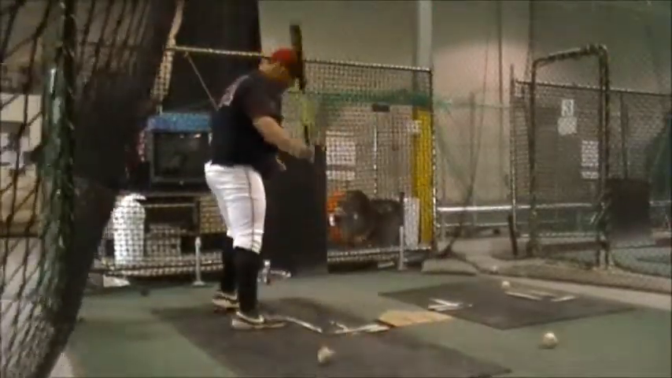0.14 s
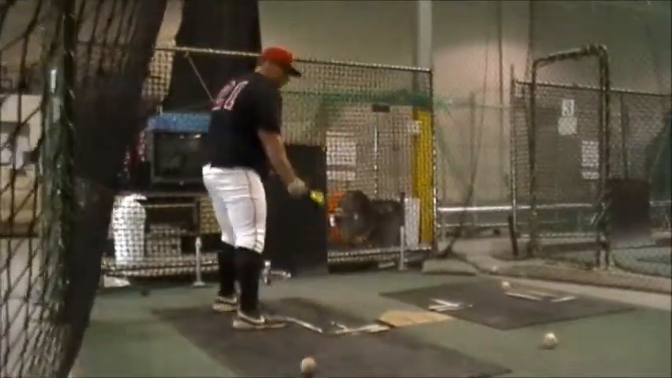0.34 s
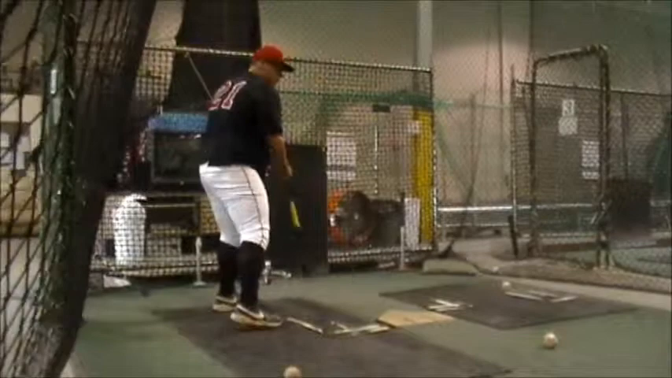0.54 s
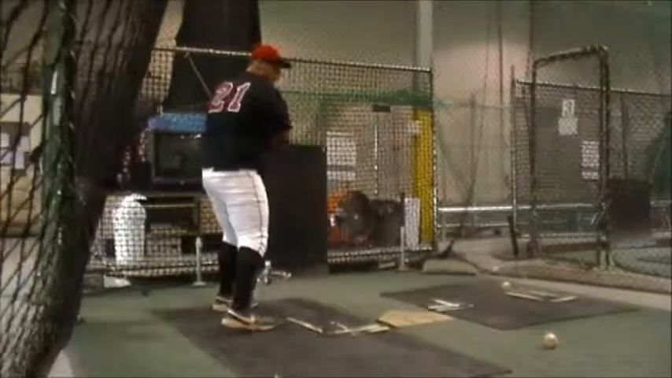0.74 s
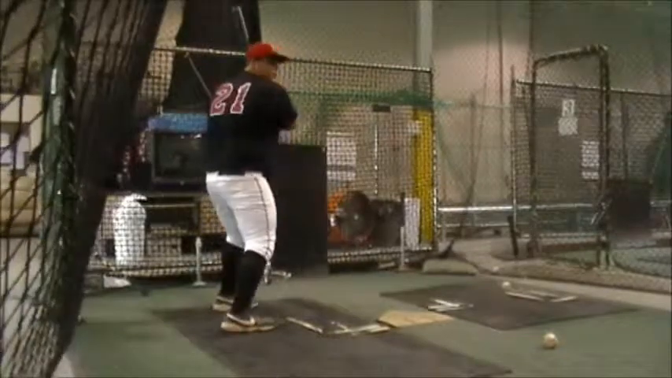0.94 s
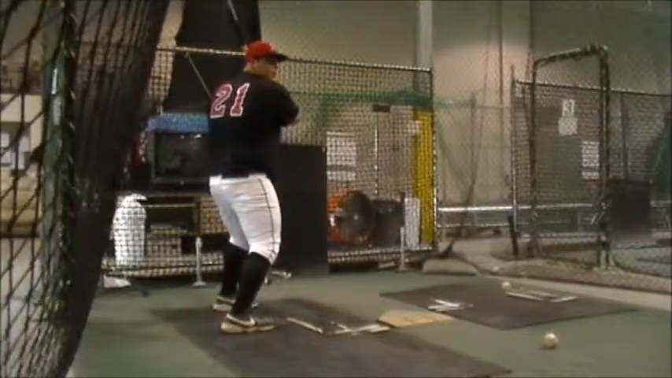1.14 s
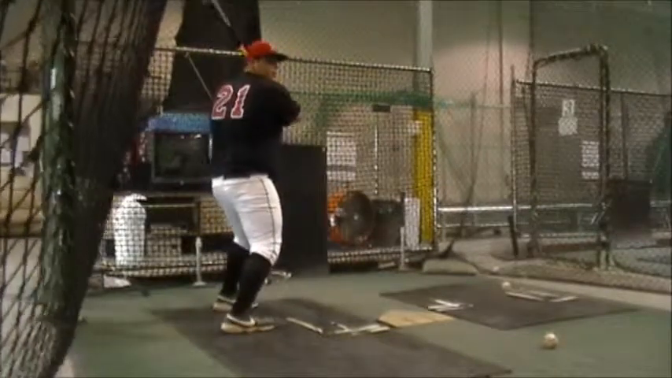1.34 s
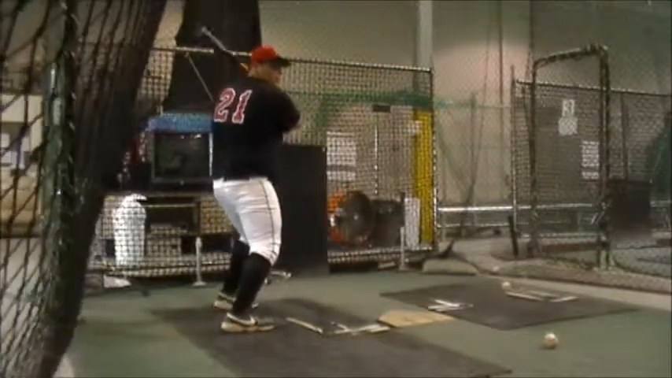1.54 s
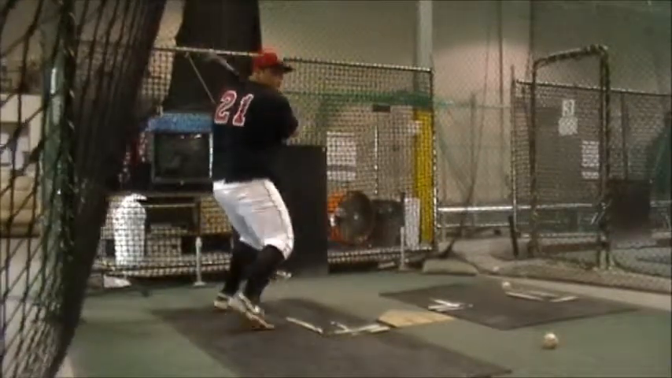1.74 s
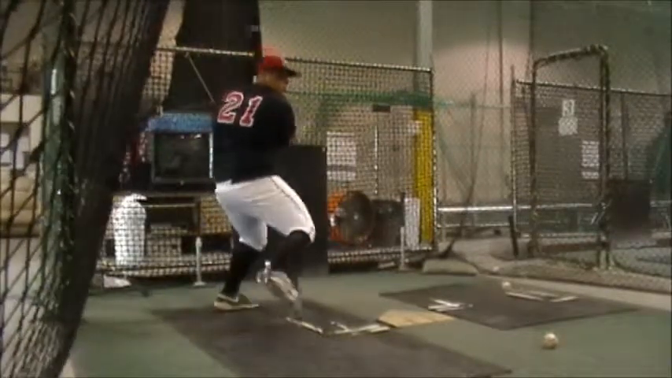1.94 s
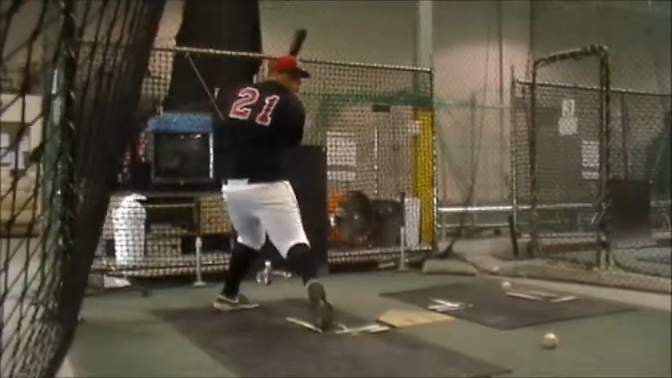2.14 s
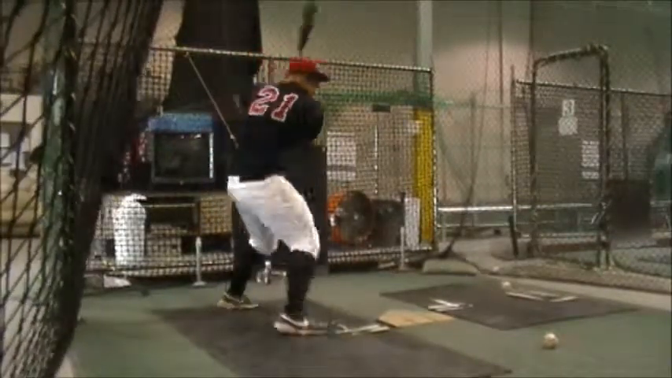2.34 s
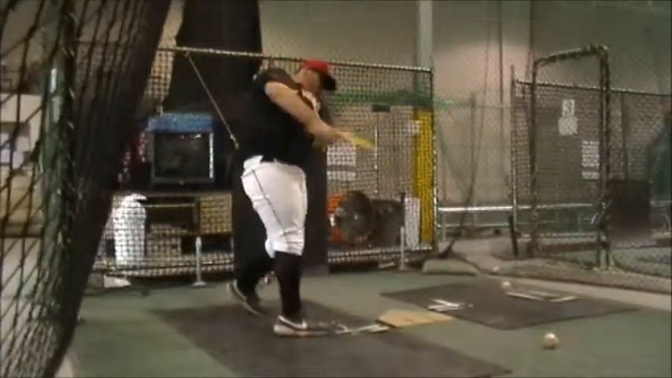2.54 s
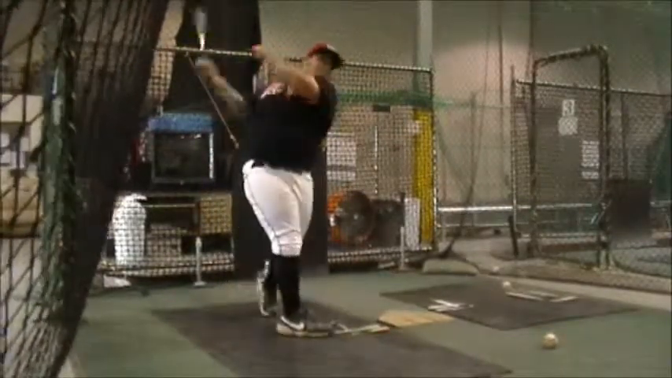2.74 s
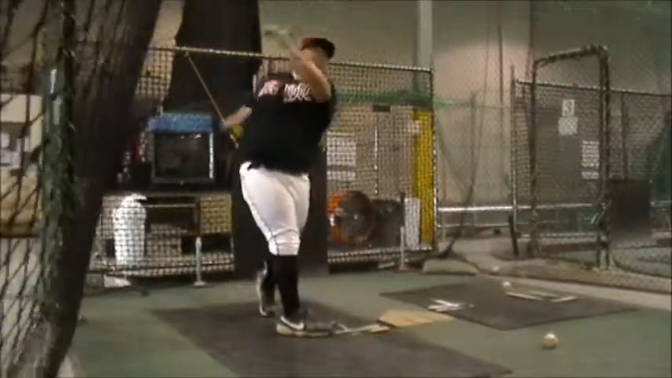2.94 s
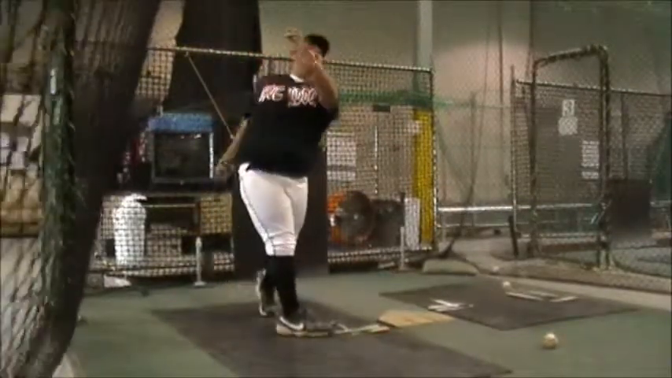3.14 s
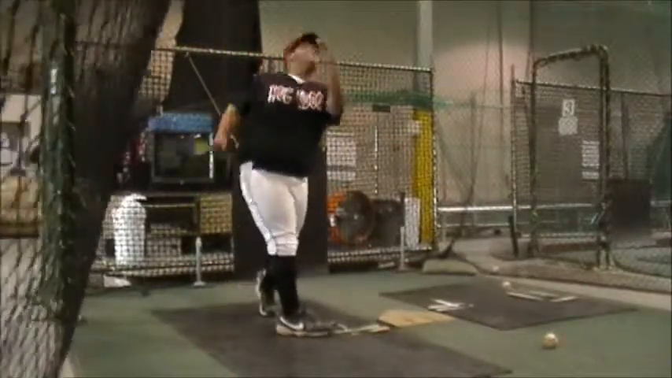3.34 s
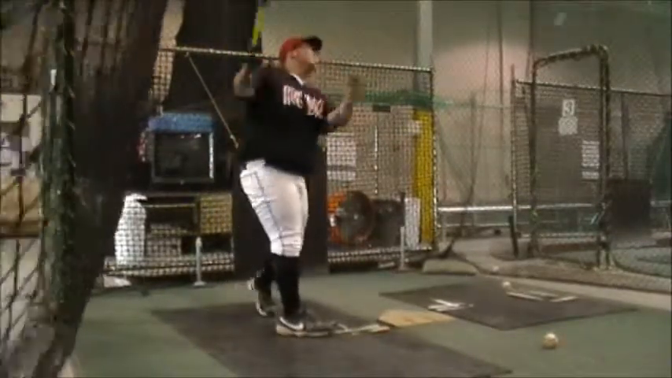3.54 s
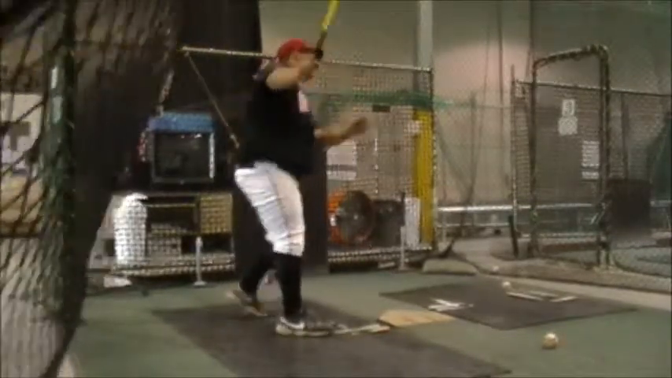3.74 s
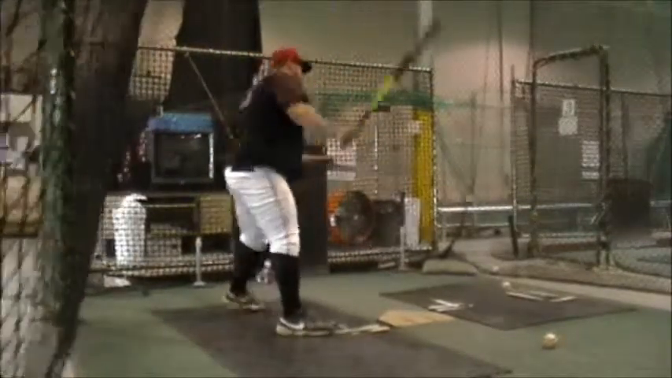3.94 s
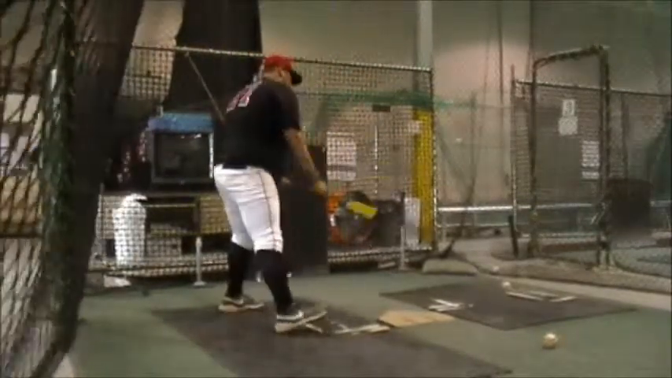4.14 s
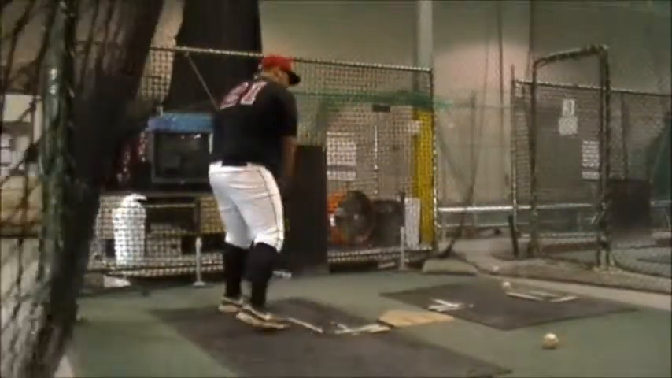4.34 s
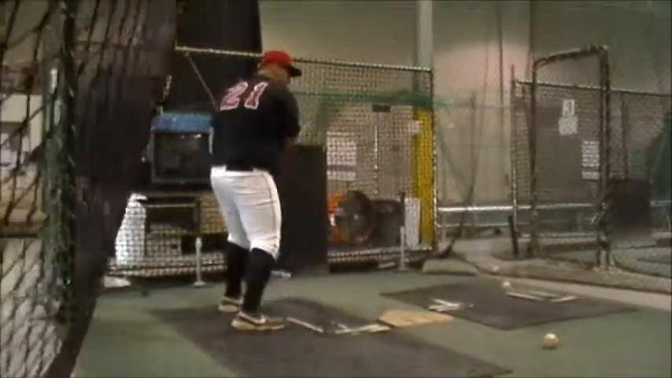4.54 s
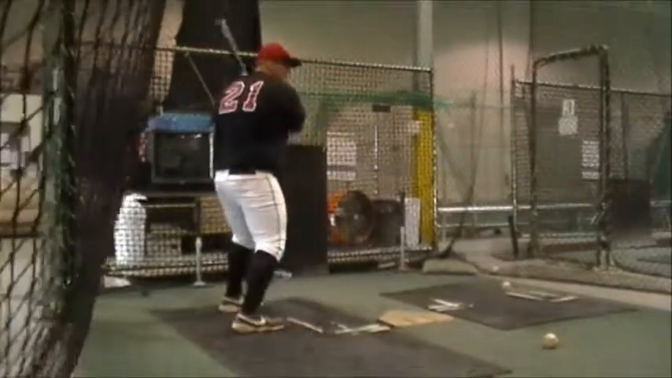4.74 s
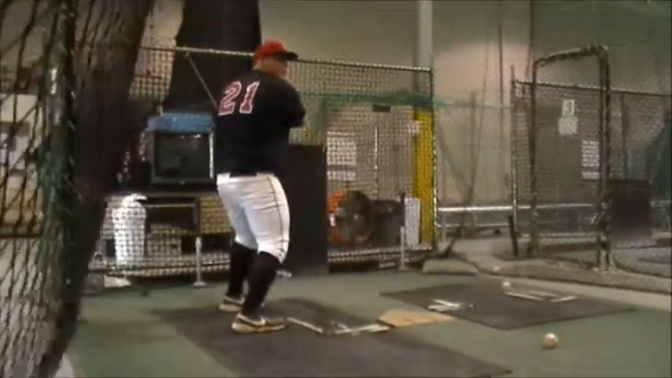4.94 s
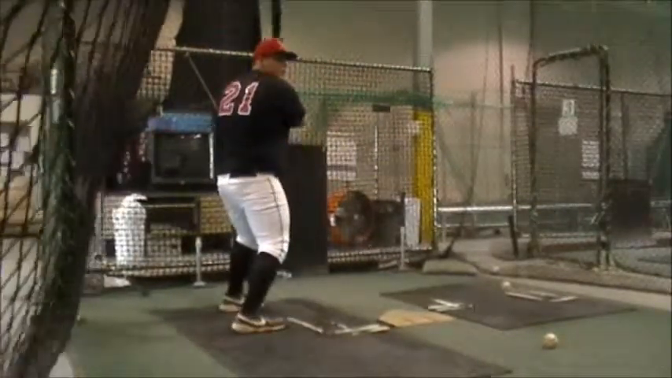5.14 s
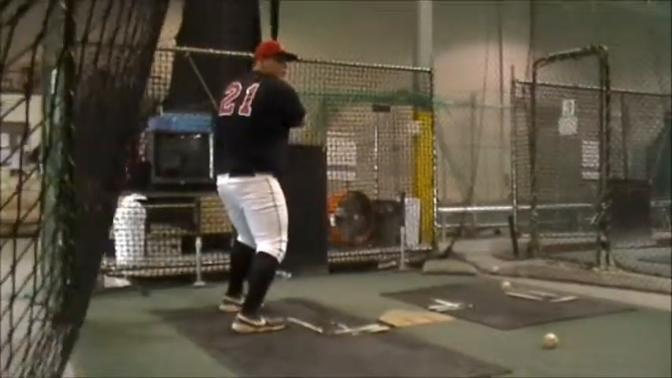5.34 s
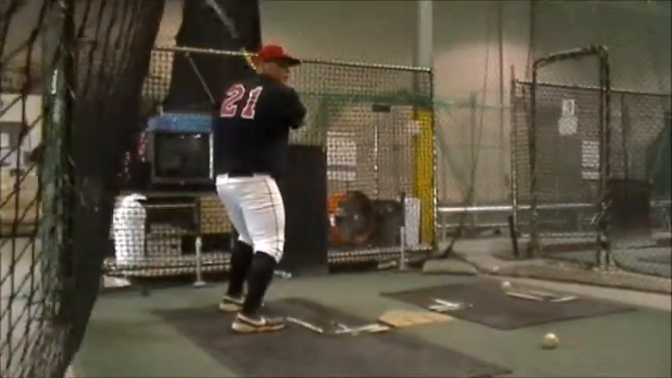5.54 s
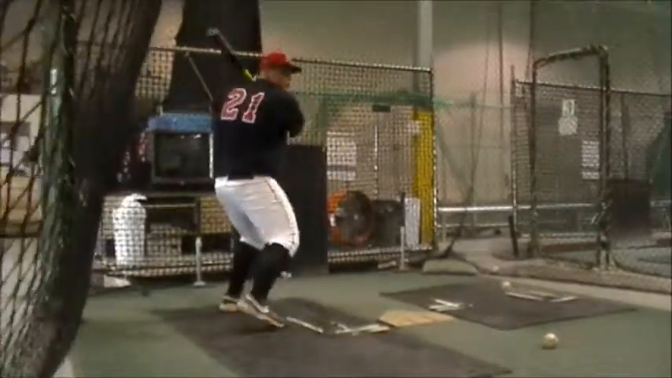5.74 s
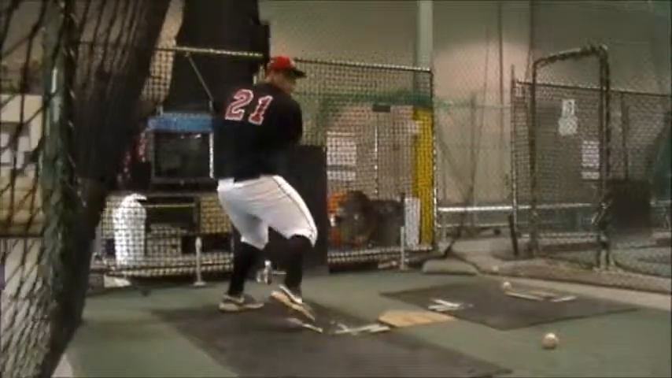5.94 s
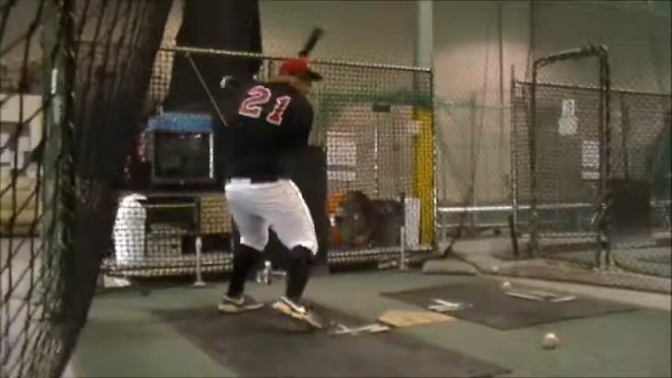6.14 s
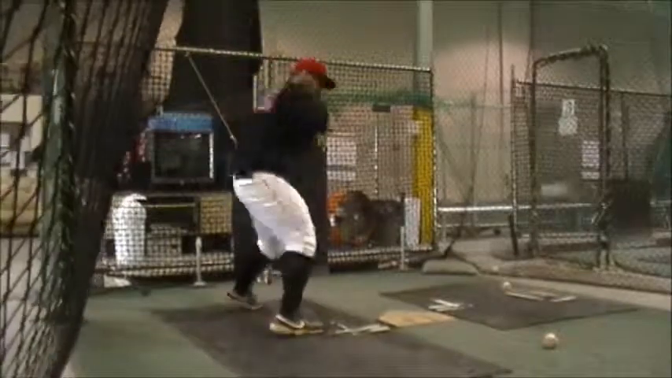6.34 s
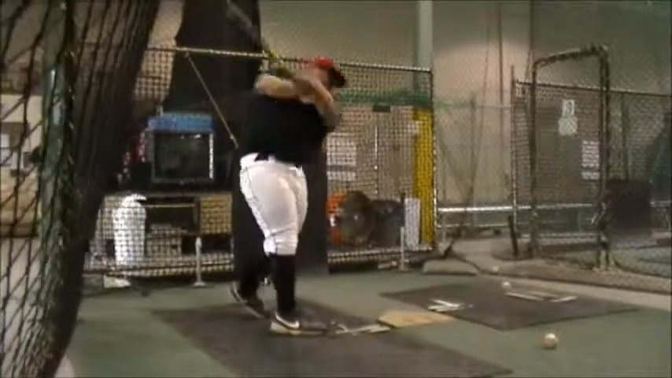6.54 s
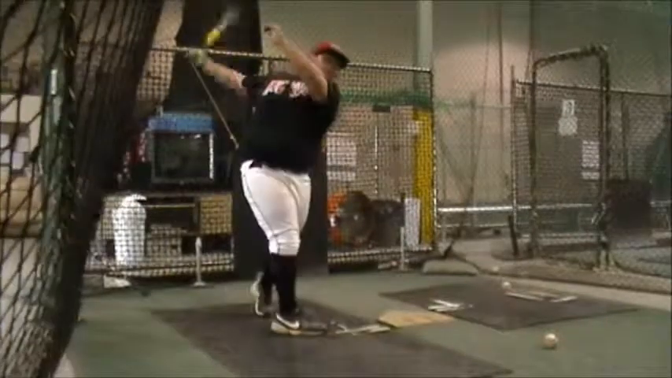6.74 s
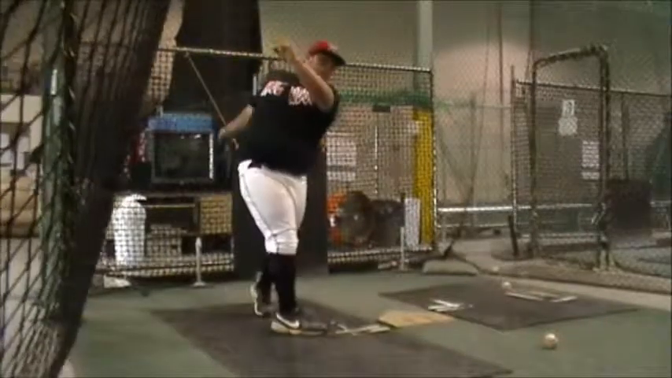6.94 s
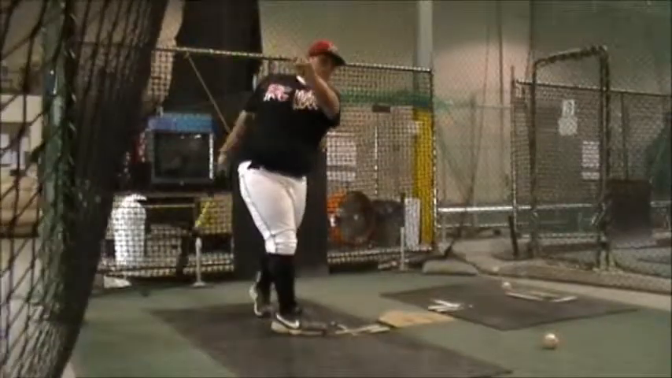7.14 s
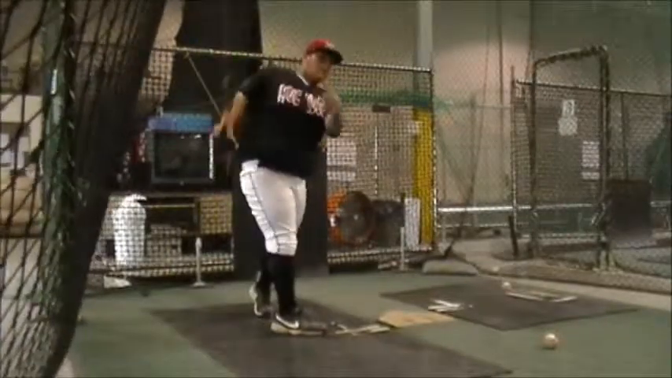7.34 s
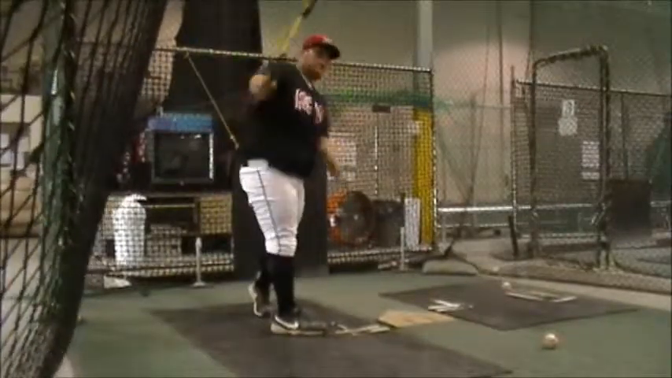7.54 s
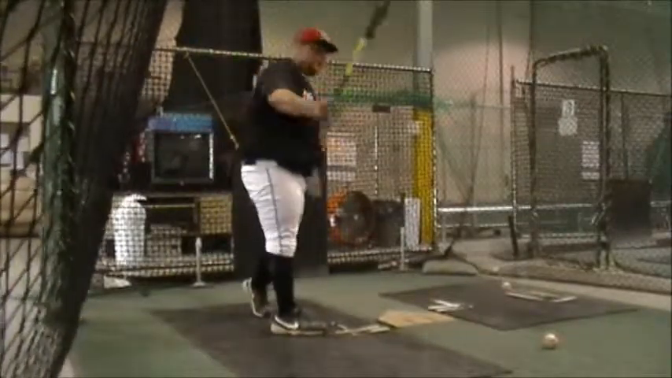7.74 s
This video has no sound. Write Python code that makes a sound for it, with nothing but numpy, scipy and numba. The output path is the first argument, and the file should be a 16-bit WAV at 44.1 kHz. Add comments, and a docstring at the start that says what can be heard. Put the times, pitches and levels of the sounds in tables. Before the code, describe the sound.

A loose ball hops on a mat with several soft, low thumps during the first 0.7 seconds, over a quiet, steady ventilation hum in a large, hard hall. Faint cloth rustle and shoe scuffs lead to a soft step. At about 2.6 seconds a metal bat swishes briefly and hits a ball with a loud crack and a bright ping; the ball at once slams into a steel screen, which rattles and rings. The crack overloads the microphone and leaves a long echo. Light scuffs follow, then a distinct ball knock near 3.9 seconds and a soft step at 4.4. Only hum and slight rustling remain until a second sharp, ringing hit at about 6.5 seconds, with a hard knock and a lighter screen rattle. As the echo fades, the ball knocks at 7.1 seconds, clinks faintly on steel and lands softly at 7.6.

```python
"""A loose ball hops over a mat to the hum of ventilation: a netted batting cage in a large, hard hall.
Shoes scuff, a jersey rustles, and twice a metal bat swishes, cracks against a ball and pings from its
hollow barrel. Each hit slams into a steel screen, which rattles and rings; the ball drops and thuds.
The cracks overload the microphone; its gain ducks and creeps back, holding up the hall's long tail."""
import sys
import numpy as np
from scipy import signal
from scipy.fft import rfft, irfft, next_fast_len
from scipy.io import wavfile
from scipy.ndimage import uniform_filter1d, map_coordinates
from numba import njit

SR = 44100
rng = np.random.default_rng(int(sys.argv[2]) if len(sys.argv) > 2 else 0)


def store_wav(level_fs):
    """Save 16-bit WAV to argv[1]."""
    pcm = np.round(np.clip(np.atleast_2d(level_fs), -1, 1) * 32767)
    wavfile.write(sys.argv[1], SR, pcm.T.astype(np.int16))


N = 344421
TIME = np.arange(N) / SR
AGE = np.arange(SR // 2) / SR  # time since a contact [s]

# the loose ball's hops: (time [s], boom [dB], tick [dB])
BALL_HOPS = [(.0, -19, -32.5), (0.1258, -12.5, -34.5), (0.2336, -18, -46), (0.3604, -23.5, -47),
             (0.445, -24, -47), (0.592, -27.5, -44), (0.686, -28, -40)]
# tick of its hide: (frequency [Hz], level [dB])
TICK_EQ = [(200, -8), (550, -2), (1200, -8), (4000, -18), (8000, -21.5), (16000, -35)]
# ventilation air bed: (frequency [Hz], level [dB])
AIR_EQ = [(15, -46), (25, -42), (48, -13), (108, 1), (141, -2), (212, 3.5), (317, -3), (394, -4), (427, -7),
          (1190, -8), (2480, -15), (3820, -18.5), (7310, -27), (12900, -44.5), (16000, -40)]
# fan and motor tones: (frequency [Hz], level [dB])
HUM_TONES = [(58, -66), (204.6, -81), (990.5, -69.5)]
# when the electrical whine stands out: (start [s], end [s])
WHINE_TIMES = [(-.1, .97), (3.25, 7.34)]
# a ball knocks on net, floor or mat:
# (time [s], level [dB], pitch [Hz], click re level [dB], thump re level [dB], pan [dB], hall send [dB])
BALL_KNOCKS = [(0.2821, -33.5, 450, 3.5, -20, -0.5, -12), (2.647, -2, 372, -17, -32, 0, -24),
               (3.22, -25, 710, -5, -10, -2, 19), (3.884, -19, 474, -30, -33, -5.5, 14),
               (3.894, -3.5, 593, -2, -8.5, -1, 1), (6.566, 4, 1075, 0, -25, -2, -12),
               (6.584, -7, 440, -20, -23, -1, -17), (7.0758, -7.5, 940, -3, -13, -6, 5),
               (7.6097, -16.5, 483, -9, -20, -4.5, 3.5)]
# light clatter after a knock: (frequency [Hz], level [dB])
REBOUND_EQ = [(100, 5), (600, 9), (2200, 7), (5000, -6), (7000, -31), (16000, -49)]
# the batter shifts in his jersey: (time [s], level [dB], half-length [s])
BODY_SHIFTS = [(1.735, -61, .012), (1.815, -65, 0.0045), (2.363, -59, 0.045), (2.454, -61, .018),
               (3.22, -58, 0.022), (4.45, -64.5, 0.69), (4.95, -58, 0.035), (6.335, -61, 0.0091)]
# cloth rustle: (frequency [Hz], level [dB])
CLOTH_EQ = [(1500, 12), (4000, 11), (9000, 1.5), (13000, 1), (16000, -6)]
# short scrapes: shoes on the mat, and at 7.388 s the grit of the ball's clink on the frame: (time [s], level
# [dB], centre [Hz], t60 [s], rise [s])
SCUFFS = [(1.718, -46, 5040, 0.12, .012), (1.739, -44.5, 6450, 0.046, .002),
          (2.397, -29, 3500, 0.013, .001), (3.645, -28.5, 3870, 0.014, .0012),
          (3.697, -40.5, 3800, 0.12, 0.0028), (3.74, -34, 5500, 0.15, 0.04),
          (3.78, -26.5, 6400, 0.018, 0.0009), (7.198, -47, 4160, 0.063, .0012),
          (7.388, -40.5, 4005, 0.048, .0012), (7.605, -47, 4340, 0.06, .0012)]
# the batter plants a foot: (time [s], level [dB], pitch [Hz])
FOOTFALLS = [(2.158, -31.5, 179), (4.431, -31.5, 327)]
# slap of the sole: (frequency [Hz], level [dB])
SOLE_EQ = [(100, -12), (600, -6), (2000, 44), (4000, -11), (6000, -27), (10000, -37), (16000, -40)]
# bat meets ball: (time [s], ping [dB], overtone re ping [dB], crack [dB], shell [dB],
# spot along the barrel [0-1], tock [dB], swish [dB], swish pitch [Hz], hall send [dB])
BAT_HITS = [(2.5877, 11, -18, 14.5, 12.5, 0.25, -1, -30, 90, -6.5),
            (6.5268, 9.5, -32, 12, 20, 0.13, -4, -28.5, 150, -6)]
# air around the swinging bat: (frequency [Hz], level [dB])
SWISH_EQ = [(30, -16), (80, -18.5), (150, -12), (300, -25.5), (1500, -27), (6000, -39.5)]
# the direct crack: (frequency [Hz], level [dB])
CRACK_EQ = [(40, -25), (150, 8.5), (600, 19), (1400, 5.5), (2300, 14), (3300, 13), (5000, 2), (8000, 9.5),
            (13000, -13), (16000, 6.5)]
# the crack thrown sideways into the hall: (frequency [Hz], level [dB])
SIDE_CRACK_EQ = [(150, -9.5), (550, 18), (1400, 15), (2300, 16), (3400, 11), (5000, 5), (8000, 0.5),
                 (16000, -21)]
# barrel shell modes that the ball damps at once: (frequency [Hz], level [dB], t60 [s])
SHELL_MODES = [(2194, -7.5, 0.017), (3501, 6, 0.021), (4388, 0, 0.022), (5497, -5.5, 0.029)]
# the bat bends as the ball squashes: (frequency [Hz], level [dB], t60 [s])
TOCK_MODES = [(320, 6, 0.021), (646, 8, 0.015), (1260, 9.5, 0.022)]
# the barrel flies away from the walls, so each gets a lower ping: (pitch [ratio], level [dB])
WALL_DOPPLERS = [(0.93, -1), (.963, -4.5), (0.89, -2), (.93, -5), (0.99, 4.5), (0.65, -7)]
# single-wall returns of a hit: (time [s], pitch [ratio], ping [dB], shell [dB], crack [dB])
SLAPBACKS = [(2.622, .965, -9, -16, -7), (2.639, .942, -2, -20, -13), (2.688, .962, -3, -14, -4),
             (2.701, .952, -5, -23, -20), (6.563, .948, -2, -8, -18), (6.603, .93, -10, -3, -8),
             (6.619, .995, 0, -7, -7)]
# ball meets screen: (time [s], clatter [dB], ring [dB], ring tilt [dB/octave], clatter t60 [s],
# clatter tilt [dB/octave], pan [dB], hall send [dB])
SCREEN_SLAMS = [(2.716, 8.5, 11, 0, 0.066, 0.44, -10, -2), (6.566, -7, -19, 4, 0.049, 1, 1, -8),
                (6.657, -6.5, -6.5, -0.5, 0.2, 0.8, -8, -6.5)]
# the screen's rattle: (frequency [Hz], level [dB])
CLATTER_EQ = [(40, -46), (120, -46), (300, -19), (550, 8), (1300, 3.5), (2000, 3.5), (3200, -2.5),
              (4100, 5), (5400, 0.5), (6500, -4.5), (10000, -10), (16000, -24.5)]
# that rattle back from the far wall: (frequency [Hz], level [dB])
FAR_CLATTER_EQ = [(150, -50), (700, 0), (2500, 9), (5000, 7.5), (6500, -0.5), (15000, -27.5)]
# clang of the steel frame: (frequency [Hz], level [dB], t60 [s])
FRAME_MODES = [(561, 1.5, 0.03), (675, -13.5, 0.097), (870, -2.5, 0.078), (1262, 4, 0.027),
               (1410, 1, 0.024), (3830, -5, 0.055)]
# hollow, beating ring of its tubes: (frequency [Hz], level [dB], t60 [s])
TUBE_MODES = [(605, -27, .5), (671, -18, 0.53), (690, -21, 0.53), (871, -16, 0.32), (897, -16, 0.33)]
# close frame modes that sing on: (frequency [Hz], level [dB], t60 [s])
SHIMMER_MODES = [(3878, -36, 1.7), (3909, -37.5, 1.85), (3935, -40, 1.6), (4011, -39, 1.4),
                 (4112, -42, 1.7)]
# the frame, lightly touched: (frequency [Hz], level [dB], t60 [s])
CLINK_MODES = [(3880, -31.5, 0.043), (4000, -47, 0.35), (4500, -49, 0.11)]
# reverb decay: (frequency [Hz], t60 [s])
HALL_DECAY = [(100, 1.5), (250, 2.77), (600, 2.81), (1300, 3.21), (2900, 1.89), (4100, 1.7), (4800, 1.43),
              (5500, 1.2), (8000, 0.88), (15000, 0.45)]
# reverb colour: (frequency [Hz], level [dB])
HALL_EQ = [(60, -109), (200, 10), (400, -17.5), (1200, -10.5), (3000, -5.5), (5000, -5.5), (8000, -7.5),
           (15000, -2.5)]
# stereo width of diffuse sound: (frequency [Hz], side re mid [dB])
STEREO_WIDTH = [(40, -2), (150, -12.5), (400, -7.5), (1000, -7.5), (2500, -8.5), (5000, -19), (9000, -41),
                (13000, -0.5)]
# notches of the microphone port: (frequency [Hz], width [Hz], depth [0-1])
PORT_NOTCHES = [(5740, 340, 0.88), (7270, 850, 0.58), (2490, 124, 0.51)]

PING_HZ, PING_T60 = 2919, 0.078  # the hollow barrel's main ring
OVERTONE_HZ, OVERTONE_T60 = 7440, 0.1  # its upper ring


def amp(db):
    """Decibels to gain."""
    return 10 ** (np.asarray(db) / 20)


def unit(x):
    """Scale to rms 1."""
    return x / np.sqrt(np.mean(x ** 2) + 1e-20)


def along(points, hz):
    """Read a curve on a log frequency axis."""
    freqs, values = np.transpose(points)
    return np.interp(np.log(hz + 1), np.log(freqs + 1), values)


def wobble(rate):
    """A smooth random curve, rate knots a second."""
    return map_coordinates(rng.standard_normal(int(N * rate / SR) + 4), [TIME * rate])


def fade_in(rise_s):
    """A softened attack."""
    return 1 - np.exp(-AGE / rise_s)


def swell(s, db, half_s):
    """A smooth rise and fall of gain around time s."""
    return amp(db) * np.exp(-.5 * ((TIME - s) / half_s) ** 2)


def gate(start, end, fade_s=0.065):
    """A soft switch that is on between two times."""
    return np.clip(np.minimum(TIME - start, end - TIME) / fade_s, 0, 1)


def filtered(x, response):
    """Shape x with a frequency response."""
    size = x.shape[-1]
    padded = next_fast_len(size + 8192)
    return irfft(rfft(x, padded) * response(np.fft.rfftfreq(padded, 1 / SR)), padded)[..., :size]


def noise(eq, size):
    """Coloured noise of rms 1, as two close microphones hear a diffuse field."""
    colour = lambda hz: amp([along(eq, hz), along(eq, hz) + along(STEREO_WIDTH, hz)])
    mid, side = filtered(rng.standard_normal((2, size)), colour)
    return unit(np.array([mid + side, mid - side]))


def burst(eq, t60):
    """Noise that starts at once and dies away."""
    return noise(eq, len(AGE)) * amp(-60 * AGE / t60)


def ring(modes, doppler=1):
    """Damped modes of a struck object; the air follows the change of its motion."""
    out = np.zeros(len(AGE))
    for k, (hz, db, t60) in enumerate(modes):
        omega = 2 * np.pi * hz * doppler
        motion = amp(db - 60 * AGE / t60) * np.sin(omega * AGE) * fade_in(1 / omega)
        out += (-1) ** k * np.diff(motion, prepend=0) * SR / omega
    return out


def add(track, s, sound):
    """Mix a sound into the track from time s."""
    start = max(round(s * SR), 0)
    part = sound[..., :N - start]
    track[:, start:start + part.shape[-1]] += part


def place(sound, pan_db, twist=3, spread=1.43, top_hz=3200, twist_hz=380):
    """Pan left (+) or right (-): by level in the mids, by phase in the bass."""
    lean = np.tanh(pan_db * np.log(10) / 40) * np.array([[1], [-1]])
    width = lambda f: spread / np.hypot(1, f / top_hz) + 1j * twist * f * twist_hz / (f*f + twist_hz**2)
    return filtered(sound, lambda f: (1 + lean * width(f)) / np.hypot(1, np.abs(lean * width(f))))


def hall(sound, blur_hz=70, build_s=0.0028, echo_s=0.086, echo_t60=0.41, echo_gain=2.67):
    """Reverb: scatter builds up through the nets, then the far wall returns a cluster of echoes."""
    # each wall hears the source from another side, so fine spectral ripple averages out
    power = np.mean(np.abs(rfft(np.atleast_2d(sound))) ** 2, axis=0)
    power = uniform_filter1d(power, size=int(blur_hz * AGE[-1]) + 1)
    colour = lambda f: np.interp(f, np.fft.rfftfreq(len(AGE), 1 / SR), np.sqrt(np.abs(power)))
    wash = filtered(noise([(100, 0), (1000, 0.009)], 2 * SR), colour)
    hz, t, bands = signal.stft(wash, SR, nperseg=256)
    decay = amp(along(HALL_EQ, hz)[:, None] - 60 * t / along(HALL_DECAY, hz)[:, None])
    tail = signal.istft(bands * decay, SR, nperseg=256)[1]
    t = np.arange(tail.shape[1]) / SR
    far_wall = echo_gain * amp(-60 * np.abs(t - echo_s) / np.where(t > echo_s, echo_t60, 1.0))
    return tail * np.minimum(t / build_s, 1) * (1 + far_wall) * np.sqrt(np.log(1000) / SR)


def loose_ball(boom_hz=190.5, boom_t60=0.049, hall_db=-2.5):
    """Each hop makes the mat boom; the hide adds a faint tick."""
    out = np.zeros((2, N))
    for s, boom_db, tick_db in BALL_HOPS:
        boom = ring([(boom_hz, boom_db, boom_t60)]) * fade_in(0.0016)
        tick = amp(tick_db) * burst(TICK_EQ, t60=0.0088)
        add(out, s, place(boom + tick, pan_db=-1))
        add(out, s, amp(hall_db) * hall(boom, build_s=0.023, echo_s=0.069, echo_t60=0.63))
    return out


def ventilation(air_db=-48.5, whine_hz=12620, whine_db=-80, motor_hz=387.3, motor_db=-59.5):
    """A bed of rushing air, wavering fan tones and thin electrical whine; a distant motor joins late."""
    def tone(hz, sway_db=3.5):
        phase = 2 * np.pi * hz * TIME + 0.18 * wobble(2.75)
        return np.sqrt(2) * np.sin(phase) * amp(sway_db * wobble(2.65))

    whine = np.sqrt(2) * np.sin(2 * np.pi * whine_hz * TIME + 1.5 * wobble(90))
    whine *= amp(whine_db) * np.maximum(sum(gate(*span) for span in WHINE_TIMES), 0.15)
    motor = amp(motor_db) * gate(5.13, np.inf, fade_s=0.21) * tone(motor_hz, sway_db=-3)
    air = amp(air_db) * noise(AIR_EQ, N)
    hum = sum(amp(db) * tone(hz) for hz, db in HUM_TONES)
    return air + hum + motor + whine


def knocks(decay_cycles=5.4, thump_ratio=0.37, lag_cycles=2.06, click_hz=2000, click_t60=0.0034):
    """A ball lands: a click, a dead thud, a lower thump as the surface gives, then a light rebound."""
    out = np.zeros((2, N))
    for s, db, hz, click_db, thump_db, pan_db, hall_db in BALL_KNOCKS:
        thump_hz = hz * thump_ratio
        thud = ring([(hz, db, decay_cycles / hz)])
        thump = ring([(thump_hz, db + thump_db, decay_cycles / thump_hz)])
        click = ring([(click_hz, db + click_db, click_t60)])
        rebound = amp(db + click_db - 10.5) * burst(REBOUND_EQ, t60=0.037) * fade_in(0.0052)
        add(out, s, place(thud + click, pan_db))
        add(out, s + lag_cycles / hz, place(thump, pan_db / 2))
        add(out, s + 0.028, rebound)
        send = np.array([thud, amp(-5) * thump, amp(-10) * click])
        add(out, s, amp(hall_db) * hall(send, echo_s=0.073, echo_t60=1.0, echo_gain=3.63))
    return out


def jersey(rest_db=-67, grain_db=3, stride_lead_s=0.14):
    """Cloth rustles unevenly with each shift of the body, stride and swing."""
    motion = amp(rest_db) + sum(swell(*shift) for shift in BODY_SHIFTS)
    for s, *_ in BAT_HITS:
        motion += swell(s - stride_lead_s, db=-64, half_s=0.11) + swell(s, db=-58, half_s=0.035)
    return motion * amp(grain_db * wobble(50)) * noise(CLOTH_EQ, N)


def scuffs(hall_db=-9):
    """Shoes rub the mat in short, bright scrapes; one scrape gives the frame's clink its grit."""
    out = np.zeros((2, N))
    for s, db, hz, t60, rise_s in SCUFFS:
        eq = [(hz / 4, -22), (hz / 2, -3), (hz, 0), (hz * 2, -10), (hz * 4, -26)]
        scuff = amp(db) * burst(eq, t60) * fade_in(rise_s)
        add(out, s, scuff)
        add(out, s, amp(hall_db) * hall(scuff, blur_hz=400))
    return out


def steps(decay_cycles=9, slap_db=-12):
    """A foot comes down on the mat with a soft thud and a slap of the sole."""
    out = np.zeros((2, N))
    for s, db, hz in FOOTFALLS:
        thud = ring([(hz, db, decay_cycles / hz)])
        add(out, s, thud + amp(db + slap_db) * burst(SOLE_EQ, t60=0.014))
    return out


def swish(hz, t60=0.096, air_db=-4):
    """The bat sweeps the air: noise and a low tone, reversed to swell into the hit."""
    whoosh = amp(air_db) * burst(SWISH_EQ, t60) + ring([(hz, 0, t60)])
    return whoosh[:, ::-1]


def bat(crack_t60=0.032, squash_s=0.00185, release_s=0.0025, bloom_s=0.0042, pan_db=-3):
    """Swish, crack of contact, tock of the bending bat, then a ping that blooms as the ball leaves."""
    out = np.zeros((2, N))
    for s, ping_db, over_db, crack_db, shell_db, spot, tock_db, swish_db, swish_hz, hall_db in BAT_HITS:
        add(out, s - AGE[-1], amp(swish_db) * swish(swish_hz))
        # a shell mode stays weak when the ball lands near one of its nodes
        shell = [(hz, shell_db + db + 10 * np.log10(np.cos(np.pi * k * spot) ** 2 + .01), t60)
                 for k, (hz, db, t60) in enumerate(SHELL_MODES)]
        ping = (PING_HZ, ping_db, PING_T60)
        barrel = ring([ping, (OVERTONE_HZ, ping_db + over_db, OVERTONE_T60)]) * fade_in(bloom_s)
        crack = amp(crack_db) * burst(CRACK_EQ, crack_t60)
        add(out, s, place(crack + ring(shell), pan_db))
        add(out, s + squash_s, place(amp(tock_db) * ring(TOCK_MODES), pan_db))
        add(out, s + release_s, place(barrel, pan_db))
        add(out, s, amp(ping_db) * after_ring())
        crack_tail = hall(burst(SIDE_CRACK_EQ, crack_t60), blur_hz=380)
        add(out, s + 0.02, amp(hall_db + crack_db - 2) * crack_tail)
        # every wall rings on with its own lowered copy of the ping
        copies = np.array([amp(db) * (ring([ping], ratio) + amp(-10) * ring(shell, ratio))
                           for ratio, db in WALL_DOPPLERS])
        ping_tail = hall(copies, blur_hz=11, build_s=0.052, echo_s=0.12, echo_gain=1)
        add(out, s, amp(hall_db + 0.5) * ping_tail)
    return out


def after_ring(re_ping_db=-43.5, t60=1.9, sway=0.003):
    """The barrel sings on faintly, its pitch swaying with the follow-through."""
    t = TIME[:2 * SR]
    hz = PING_HZ * (1 + sway * wobble(5.27)[:len(t)])
    return amp(re_ping_db - 60 * t / t60) * np.sin(2 * np.pi * np.cumsum(hz) / SR)


def wall_echoes(smear_s=0.03):
    """Nearby walls slap back the crack and ping, softened and drawn out by the nets."""
    out = np.zeros((2, N))
    shell = [(hz, db, t60 + smear_s) for hz, db, t60 in SHELL_MODES]
    for s, ratio, ping_db, shell_db, crack_db in SLAPBACKS:
        ping = ring([(PING_HZ, ping_db, PING_T60 + smear_s)], ratio)
        crack = amp(crack_db) * burst(SIDE_CRACK_EQ, t60=0.07)
        add(out, s, (ping + amp(shell_db) * ring(shell, ratio) + crack) * fade_in(0.006))
    return out


def screen(far_wall_s=0.094, far_db=-11):
    """The driven ball rattles the screen and rings its frame and tubes; the far wall answers."""
    out = np.zeros((2, N))
    for s, clatter_db, ring_db, ring_tilt, t60, tilt, pan_db, hall_db in SCREEN_SLAMS:
        eq = [(hz, db + tilt * np.log2(hz / 2000)) for hz, db in CLATTER_EQ]
        clatter = amp(clatter_db) * burst(eq, t60) * fade_in(0.00031)
        modes = [(hz, db + ring_tilt * np.log2(hz / 700), decay) for hz, db, decay in FRAME_MODES]
        frame = amp(ring_db) * ring(modes)
        tubes = amp(0.87 * ring_db - 3) * ring(TUBE_MODES) * fade_in(0.032)
        add(out, s, place(clatter + frame, pan_db, twist=1.3) + tubes)
        add(out, s, amp(ring_db) * shimmer())
        add(out, s, amp(hall_db) * hall(clatter + amp(-10) * frame, blur_hz=222))
        far_clatter = burst(FAR_CLATTER_EQ, t60=0.46) * fade_in(0.019)
        add(out, s + far_wall_s, amp(clatter_db + hall_db + far_db) * far_clatter)
    return out


def shimmer(waver_db=2, stray_rad=0.62, rate=22):
    """Long modes of the rocking frame, each wavering by itself in level and phase."""
    t = TIME[:2 * SR]
    out = np.zeros(len(t))
    for hz, db, t60 in SHIMMER_MODES:
        envelope = amp(db - 60 * t / t60 + waver_db * wobble(rate)[:len(t)])
        out += envelope * np.sin(2 * np.pi * hz * t + stray_rad * wobble(rate)[:len(t)])
    return out


def clink(at_s=7.387):
    """The settling ball touches the steel frame once more."""
    out = np.zeros((2, N))
    add(out, at_s, ring(CLINK_MODES))
    return out


def scene():
    """The full mix: hits up front, then balls, the batter's foley and the room tone."""
    hits = bat() + wall_echoes() + screen() + clink()
    return hits + knocks() + loose_ball() + steps() + jersey() + scuffs() + ventilation()


@njit
def ducking(excess_db, attack, release):
    """Gain reduction in dB: jumps up with the excess level, falls back at a steady rate."""
    out, held = np.zeros(len(excess_db)), 0.0
    for i, excess in enumerate(excess_db):
        held = held + attack * (excess - held) if excess > held else max(held - release, 0.0)
        out[i] = held
    return out


def record(dry, threshold_db=-14, attack_s=0.0055, recover_db_per_s=41, ceiling=0.63,
           low_cut_hz=34, top_hz=15950):
    """Microphone chain: port notches, gain control, overload before the gain has dropped, band limit."""
    port = lambda f: np.prod([1 - depth * 1j * f * width / (hz * hz - f * f + 1j * f * width)
                              for hz, width, depth in PORT_NOTCHES], axis=0)
    x = filtered(dry, port)
    power = uniform_filter1d(np.mean(x ** 2, axis=0), size=88)
    level_db = 10 * np.log10(np.abs(power) + 1e-12)
    x = x * amp(-ducking(level_db - threshold_db, 1 / (attack_s * SR), recover_db_per_s / SR))
    # the preamp lifts the treble, which overloads first; the wind filter thins the distortion's bass
    lift = lambda f: (1 + 1j * f / 900) / (1 + 1j * f / 2800) * (1 + 250 / (1j * f + low_cut_hz))
    x = filtered(x, lift)
    x = x / (1 + np.abs(x / ceiling) ** 4) ** (1 / 4)  # soft clip
    band = lambda f: f ** 4 / (f ** 4 + low_cut_hz ** 4) / (1 + (f / top_hz) ** 120)
    return filtered(x, lambda f: band(f) / lift(f))


dry = scene()
out = record(dry)
store_wav(out)
```